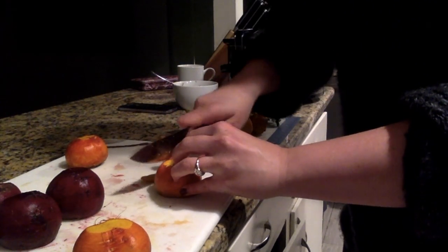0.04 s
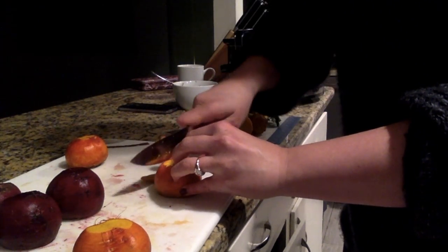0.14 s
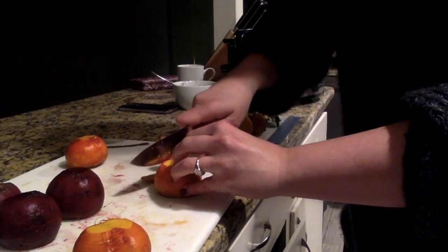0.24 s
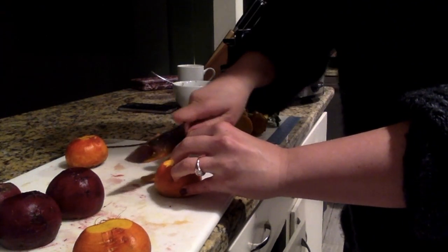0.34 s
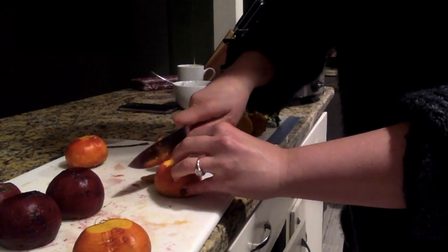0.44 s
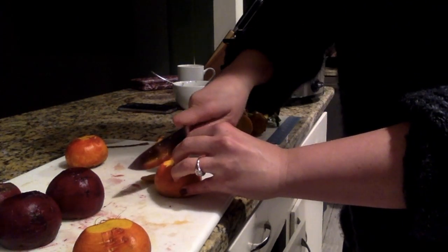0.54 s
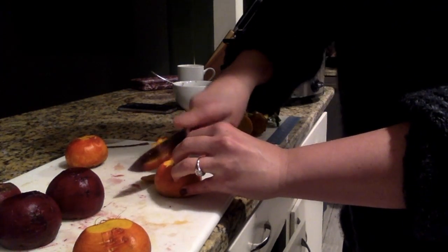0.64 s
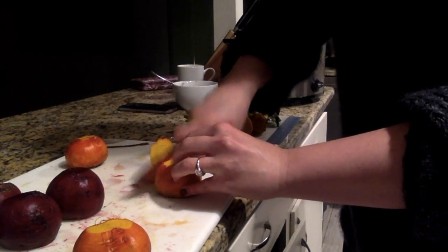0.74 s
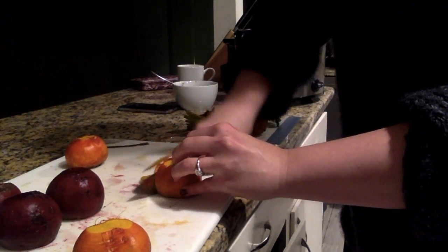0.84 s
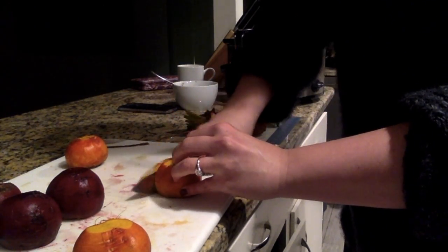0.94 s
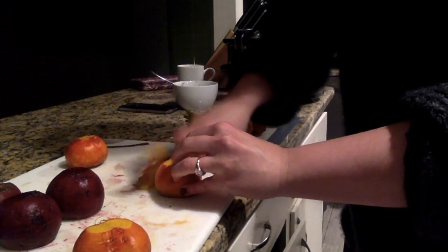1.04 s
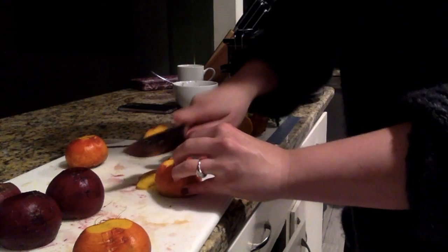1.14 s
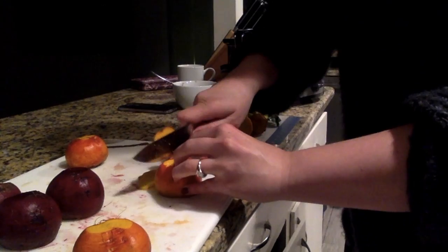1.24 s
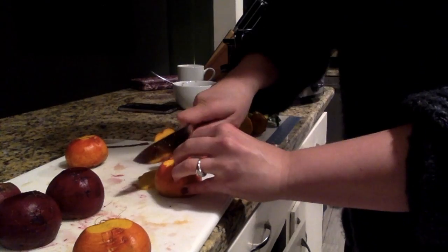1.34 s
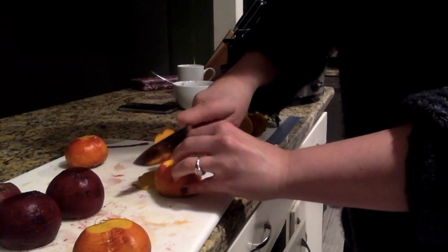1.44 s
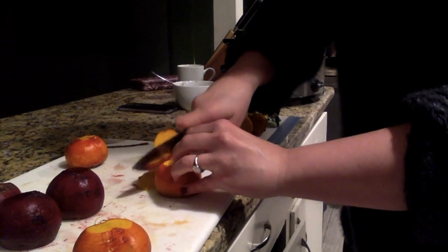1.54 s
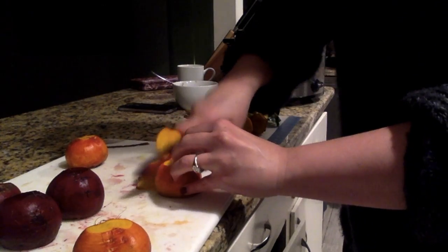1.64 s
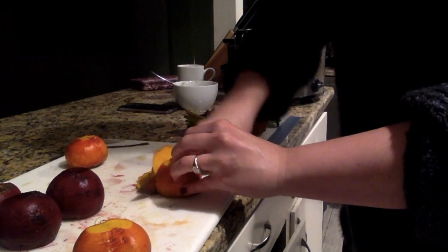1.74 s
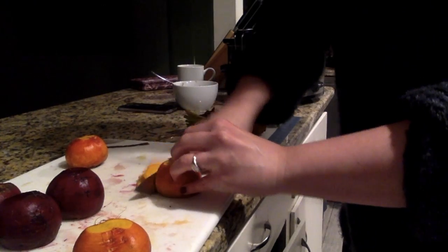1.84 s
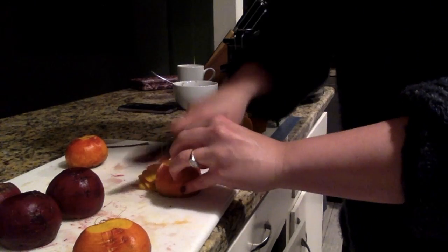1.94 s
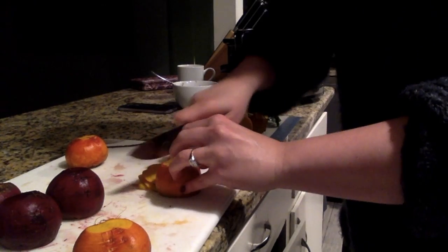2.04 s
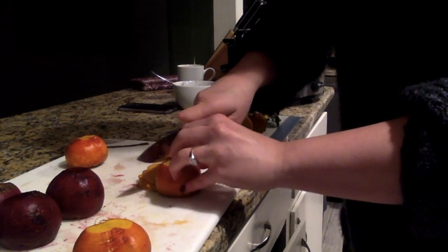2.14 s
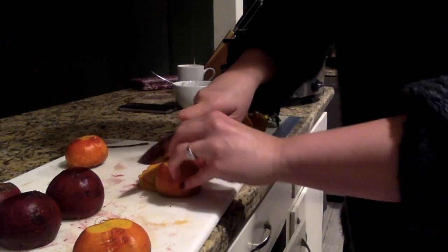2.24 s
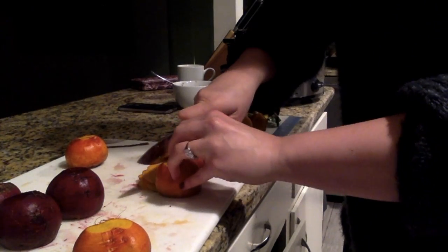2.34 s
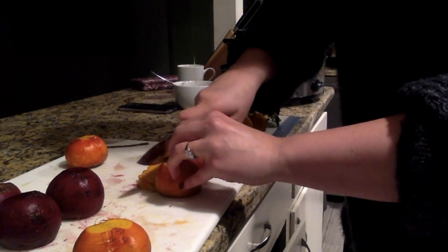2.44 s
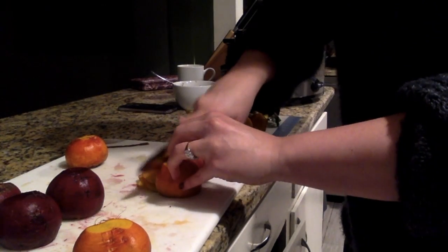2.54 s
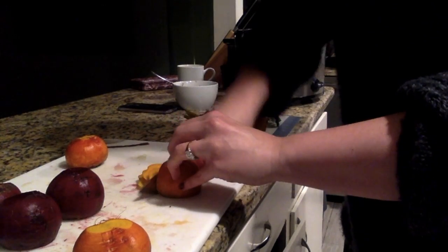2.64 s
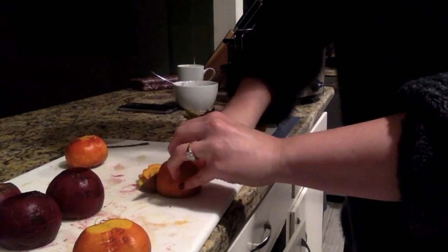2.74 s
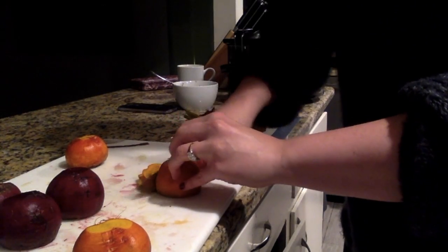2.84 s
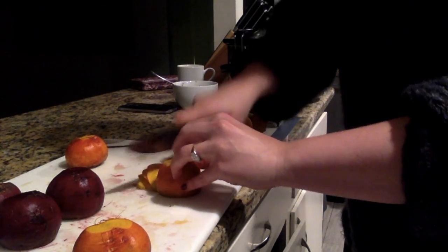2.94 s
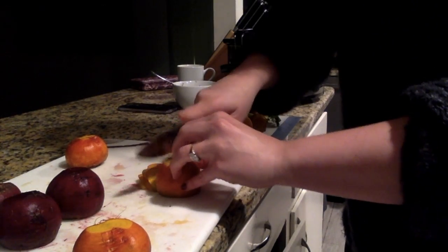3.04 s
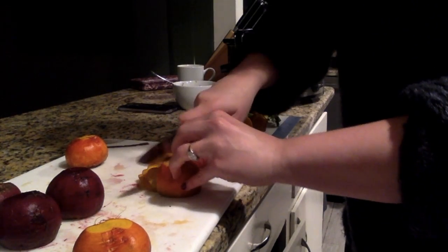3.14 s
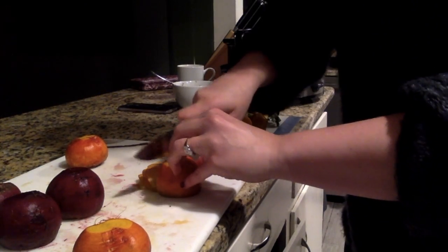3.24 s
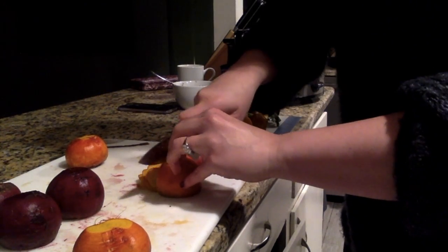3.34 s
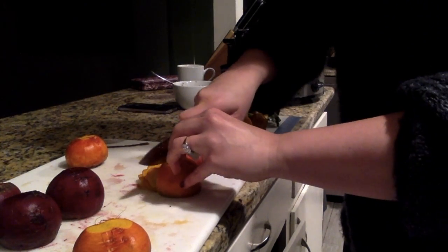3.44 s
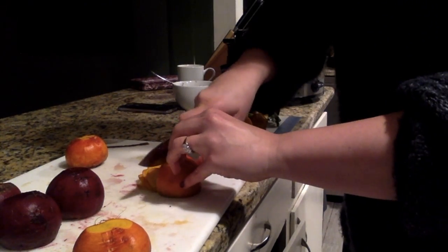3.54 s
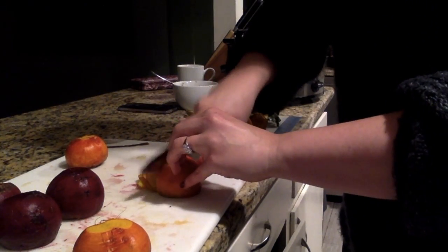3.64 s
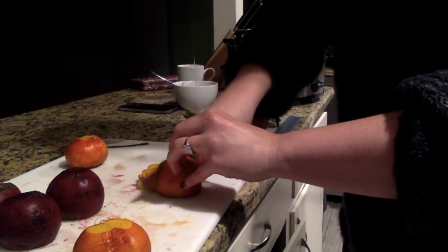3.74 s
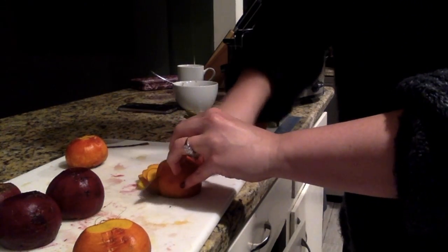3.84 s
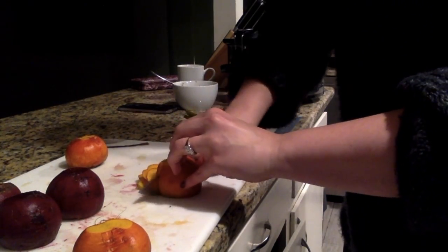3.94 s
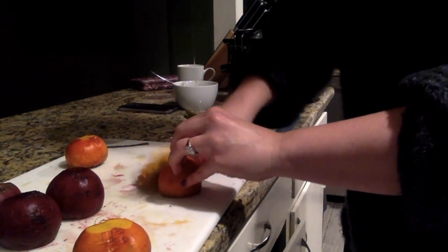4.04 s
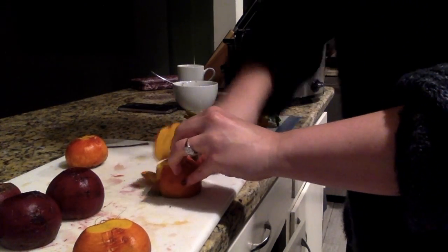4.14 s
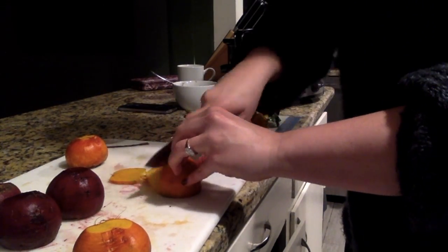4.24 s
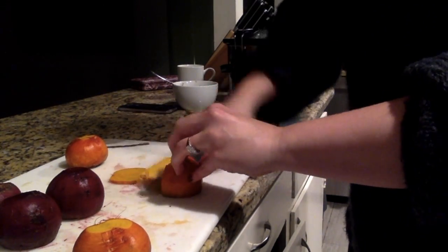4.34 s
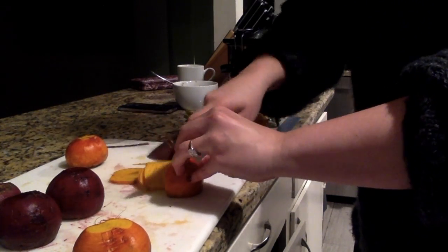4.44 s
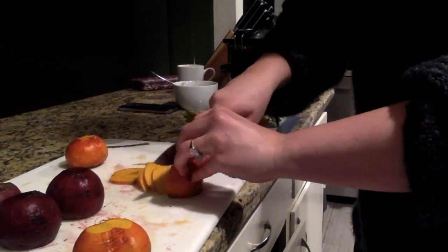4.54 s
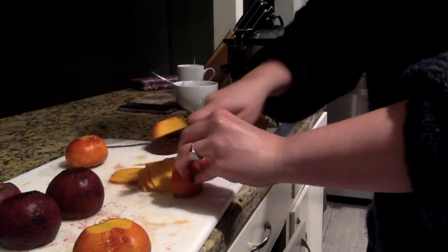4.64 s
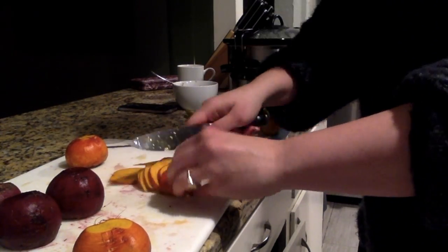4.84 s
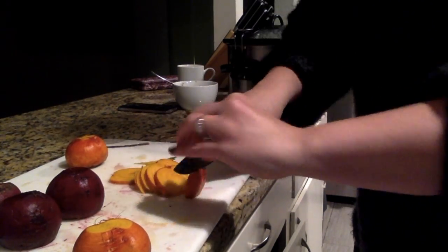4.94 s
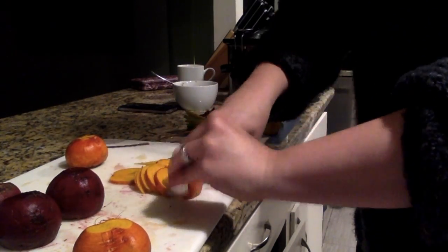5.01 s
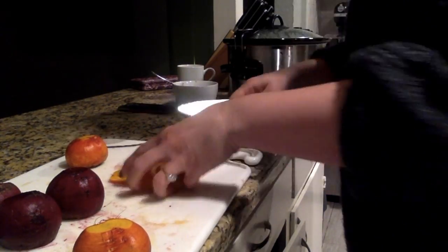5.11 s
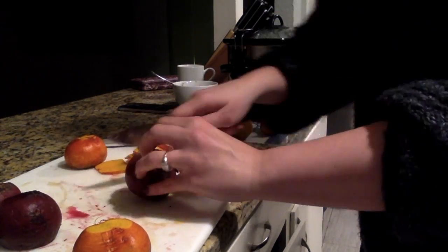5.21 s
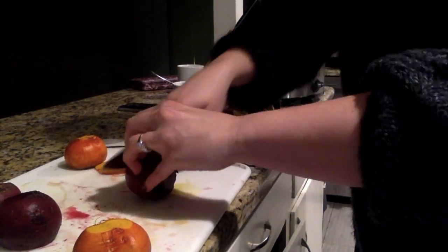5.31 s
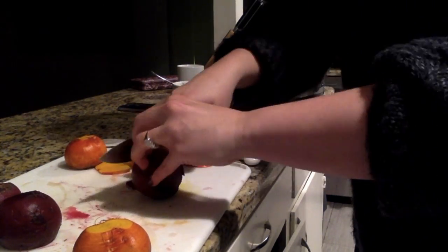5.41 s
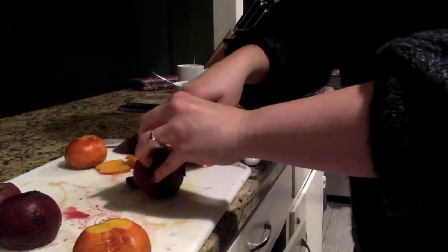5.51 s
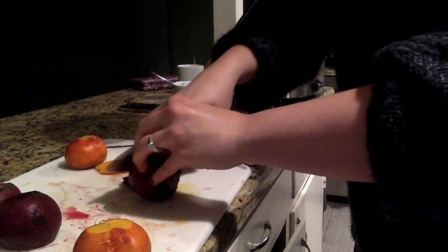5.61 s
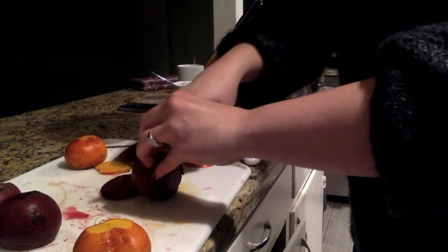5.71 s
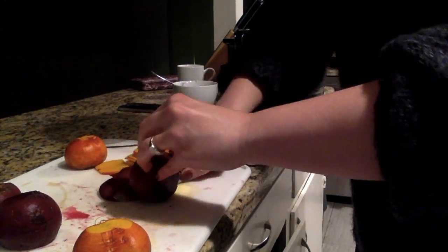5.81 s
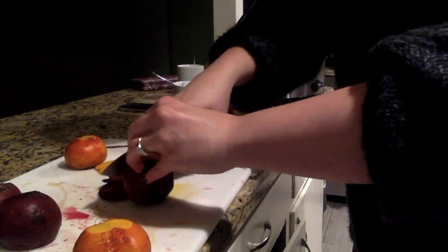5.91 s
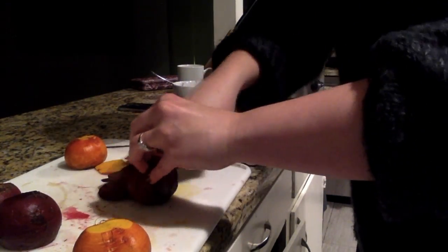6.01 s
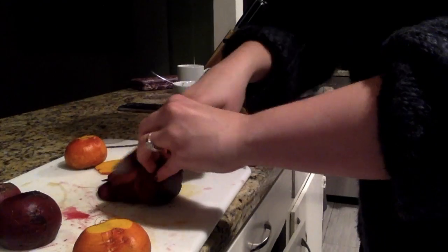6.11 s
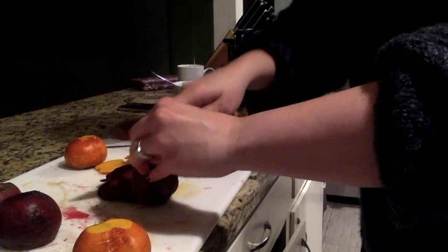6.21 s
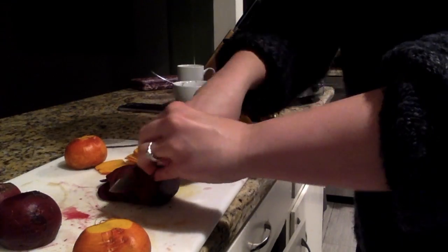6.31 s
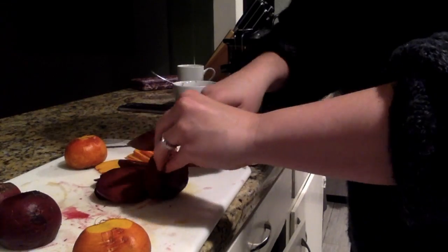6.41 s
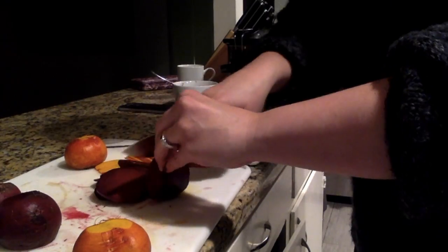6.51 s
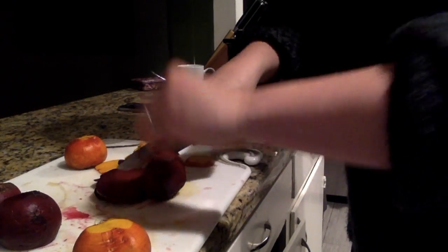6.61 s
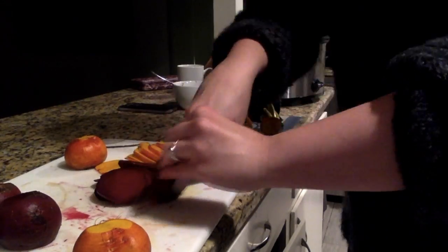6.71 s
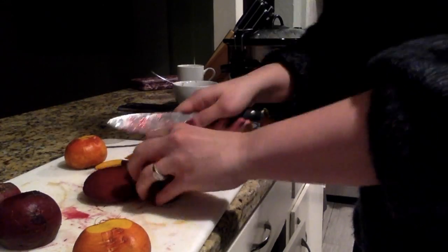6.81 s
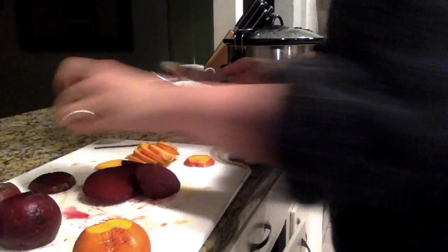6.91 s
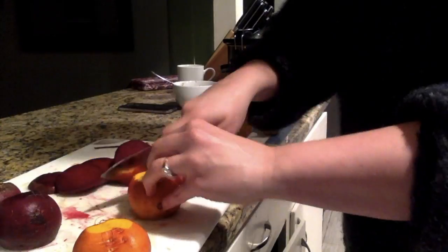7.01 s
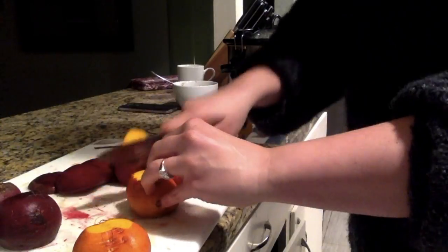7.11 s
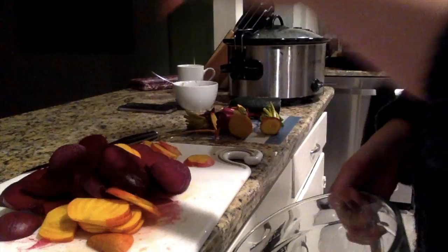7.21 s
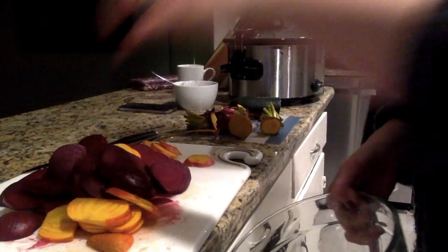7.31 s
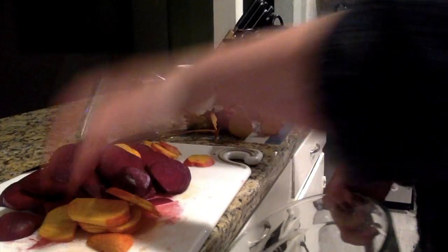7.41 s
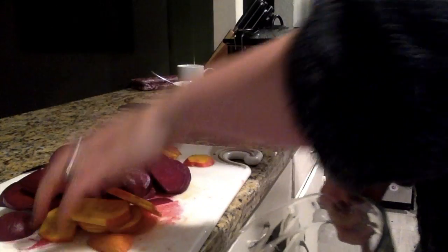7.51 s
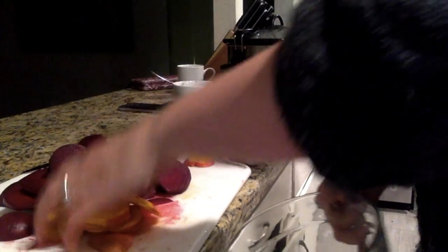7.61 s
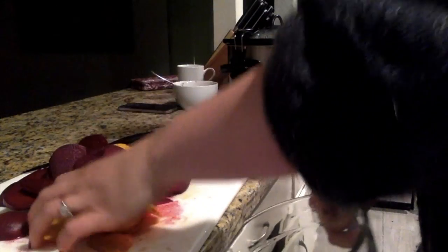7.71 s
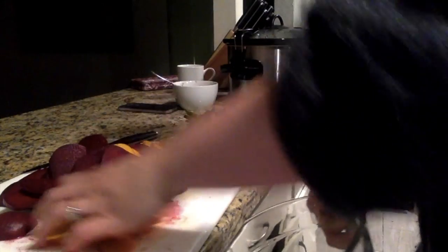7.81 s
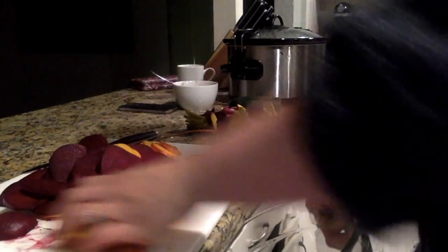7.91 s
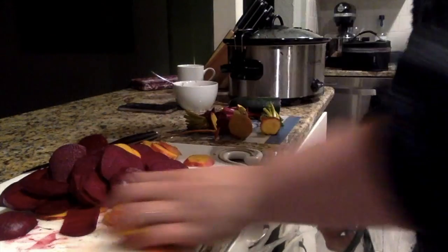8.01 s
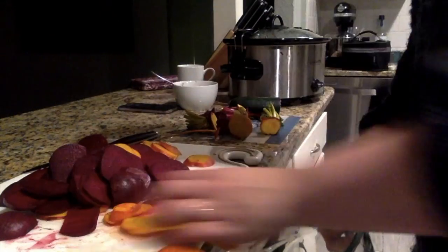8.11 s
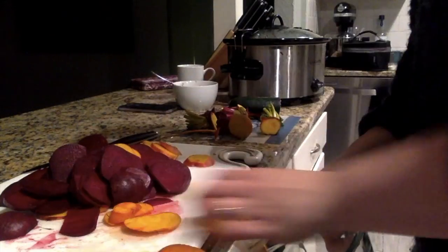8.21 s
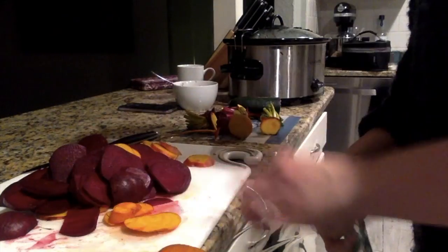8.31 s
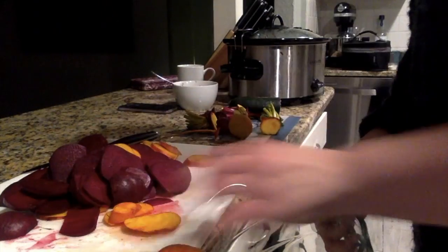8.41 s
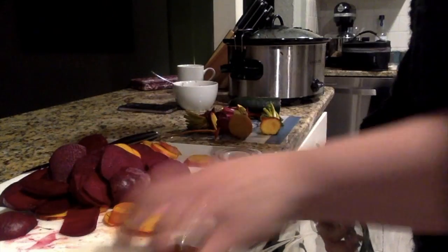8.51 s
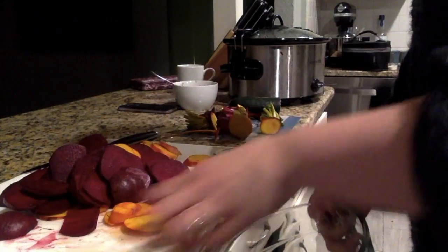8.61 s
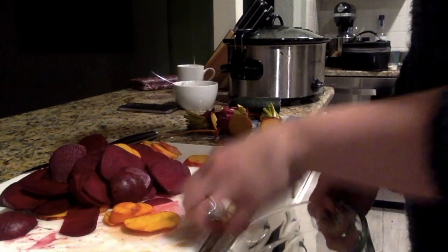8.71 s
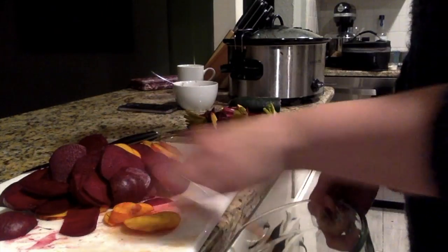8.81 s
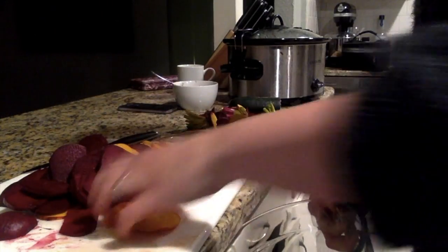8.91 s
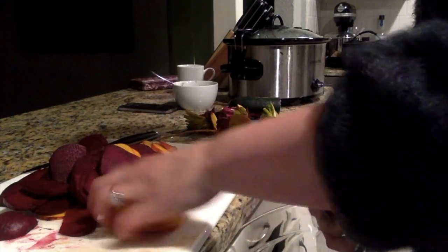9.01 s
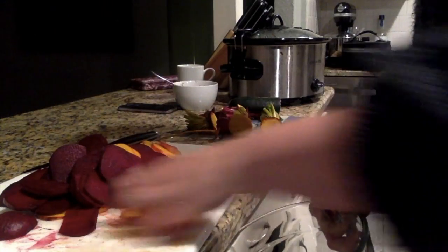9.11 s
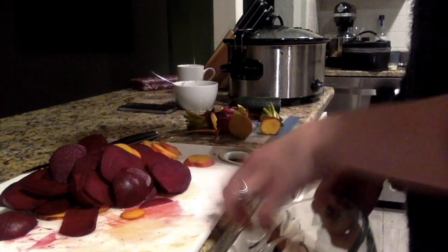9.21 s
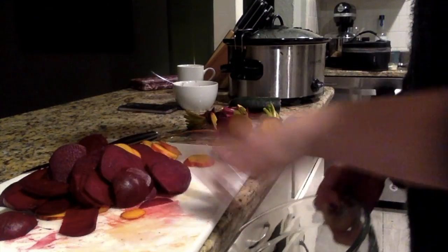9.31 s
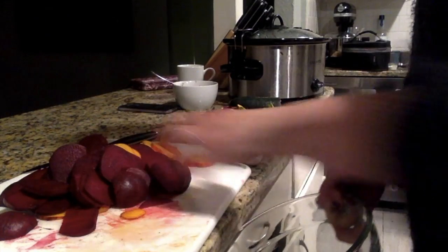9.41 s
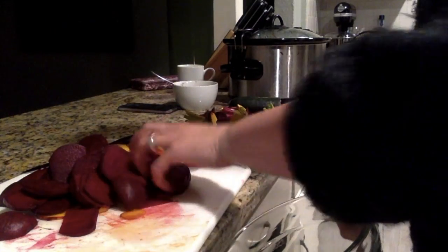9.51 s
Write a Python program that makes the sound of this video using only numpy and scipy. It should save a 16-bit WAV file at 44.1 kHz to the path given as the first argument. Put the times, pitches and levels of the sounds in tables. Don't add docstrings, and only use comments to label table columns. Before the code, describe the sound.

Near microphone, quiet kitchen with low hum. Four unhurried knife knocks on a board, each preceded by a short wet crunch, the third overloading slightly. Then about three seconds of dry, irregular, sped-up ticking with thin, high-pitched hum. It cuts to silence, normal speed returns, and beet slices are swept by hand, squeak faintly on plastic and land in a glass bowl in muffled, clinking thumps.

```python
import sys
import numpy as np
from scipy import signal
from scipy.fft import rfft, irfft, next_fast_len
from scipy.io import wavfile
from scipy.ndimage import uniform_filter1d, map_coordinates

SR = 44100
rng = np.random.default_rng(int(sys.argv[2]) if len(sys.argv) > 2 else 0)


def amplitude_ratio(level_db):
    exponent = np.asarray(level_db, float) / 20
    return 10 ** exponent


def to_wav(s):
    ch = np.atleast_2d(s).T
    pcm = np.round(np.clip(ch, -1, 1) * 32767)
    wavfile.write(sys.argv[1], SR, pcm.astype(np.int16))


N = 421155


def unit(x):
    return x / np.sqrt(np.mean(x ** 2) + 1e-20)


def along(points, hz):
    f, v = np.transpose(points)
    return np.interp(np.log(hz + 1), np.log(f + 1), v)


def noise(size, gain):
    m = next_fast_len(size)
    spectrum = rfft(rng.standard_normal(m)) * gain(np.fft.rfftfreq(m, 1 / SR))
    return unit(irfft(spectrum, m)[:size])


def add(track, s, sound):
    part = track[round(s * SR):][:len(sound)]
    part += sound[:len(part)]


def blow(db_of, decay, seconds, early_db, early_t60, direct, direct_s, attack):
    size = next_fast_len(int(seconds * SR))
    t, hz = np.arange(size) / SR, np.fft.rfftfreq(size, 1 / SR)
    centres = 30 * 1.35 ** np.arange(23)[:, None]
    shares = np.clip(1 - abs(np.log((hz + 1) / centres) / np.log(1.35)), 0, 1)
    bands = irfft(rfft(rng.standard_normal(size)) * amplitude_ratio(db_of(hz)) * shares, size)
    fading = bands * amplitude_ratio(-60 * t / along(decay, centres))
    tail = np.sum(fading, axis=0) / bands.sum(axis=0).std()
    early = amplitude_ratio(-early_db) + amplitude_ratio(-60 * t / early_t60) + direct * np.exp(-(t / direct_s) ** 4)
    return tail * early * (1 - np.exp(-t / attack))


def ring(modes, size, gains, rough_db, attack):
    t = np.arange(size) / SR
    hz, db, t60 = np.transpose(modes)[:, :, None]
    chance = rng.standard_normal((len(modes), 120))
    flutter = np.array([np.interp(220 * t, np.arange(len(row)), row) for row in chance])
    level = db + along(gains, hz) + rough_db * flutter - 60 * t / t60
    return np.sum(amplitude_ratio(level) * np.sin(2 * np.pi * hz * t), axis=0) * (1 - np.exp(-t / attack))


# f/Hz, density/dB per Hz
FIZZ_SPECTRUM = [(4000, -31), (5800, -6), (7000, -11.5), (10000, -2.5), (15300, -0.5), (15900, -1),
                 (16200, -40.5)]


def stroke(rows, spectrum, rate, depth_db, patchy_db):
    s, body_db, fizz_db, centre, spread = np.transpose(rows)
    size = int((s[-1] - s[0] + .012) * SR)
    t = s[0] + np.arange(size) / SR
    hz, frames, z = signal.stft(rng.standard_normal((2, size)), SR, nperseg=256)
    octaves = np.log2((hz[:, None] + 1) / np.interp(s[0] + frames, s, centre))
    away = octaves / (np.interp(s[0] + frames, s, spread) + 0.085)
    body = amplitude_ratio(along(spectrum, hz)[:, None] - 6 * away ** 2)
    fizz = amplitude_ratio(along(FIZZ_SPECTRUM, hz)[:, None] + 0 * away)
    colour = np.array([g / np.sqrt(np.mean(g ** 2, axis=0)) for g in (body, fizz)])
    patches = uniform_filter1d(rng.standard_normal(z.shape), size=4, axis=1)
    patches = uniform_filter1d(patches, size=10, axis=2)
    pair = signal.istft(z * colour * amplitude_ratio(patchy_db * unit(patches)), SR, nperseg=256)[1][:, :size]
    jumps = map_coordinates(rng.standard_normal(int(size * rate / SR) + 4), [np.arange(size) * rate / SR])
    return amplitude_ratio(depth_db * jumps + [np.interp(t, s, body_db), np.interp(t, s, fizz_db)]) * pair


def rubbing(spans, spectrum, rate, depth_db, patchy_db, wet_db):
    out, t = np.zeros(N + SR), np.arange(SR // 2) / SR
    for rows in spans:
        dry = stroke(rows, spectrum, rate, depth_db, patchy_db)
        tails = rng.standard_normal((2, len(t))) * amplitude_ratio(-60 * t / [[.4], [.14]])
        tails /= np.linalg.norm(tails, axis=1, keepdims=True)
        add(out, rows[0][0], dry.sum(axis=0))
        add(out, rows[0][0], amplitude_ratio(wet_db) * signal.fftconvolve(dry, tails, axes=1).sum(axis=0))
    return out[:N]


# t/s, peak level/dB, weight/dB
CHOPS = [
    (.784, -12, -7),
    (1.689, -15, -14.5),
    (2.622, 0.5, 17.5),
    (3.826, -13.5, -19),
]
# f/Hz, density/dB per Hz
BOARD_SPECTRUM = [(35, -80), (60, -51), (290, -35.5), (586, -32.5), (742, -16.5), (1080, -10.5), (1240, -6),
                  (1810, -13.5), (2190, -30), (2580, -20), (3950, -21.5), (4500, -30), (6920, -43.5),
                  (15400, -48.5), (16500, -79.5)]
# f/Hz, width/Hz, level/dB
BOARD_RESONANCES = [(1210, 210, 3), (2150, 48, -3.5), (2620, 130, 2.5), (2949, 160, -5.5), (3591, 100, 2),
                    (4565, 260, -1.5)]
# f/Hz, level/dB, t60/s
BOARD_MODES = [(790, -17, 0.22), (873, -8, 0.036), (964.5, -6.5, 0.22), (1115, -9, .3), (1210, -5.5, .35),
               (1290, -3, 0.3), (1569, -9, 0.016), (1779, -19, 0.028), (2530, -20, 0.35), (3240, -20, .25),
               (3550, -23.5, .35), (3697, -21, .3)]
# f/Hz, t60/s
KITCHEN_DECAY = [(80, 0.22), (250, 0.33), (600, 0.51), (1300, 0.52), (2700, 0.56), (4000, 0.54),
                 (4800, .44), (5800, 0.47)]
# f/Hz, t60/s
TREBLE_DECAY = [(7500, .19), (12000, .15)]
BOOM_DB, BRIGHT_PER_WEIGHT, BRIGHT_DB = -1.5, .48, -0.5
LINGER, LINGER_PER_DB = 1.183, 0.0216


def chops():
    out = np.zeros(N)

    def resonances(hz):
        return sum(db * np.exp(-((hz - c) / w) ** 2) for c, w, db in BOARD_RESONANCES)

    for s, db, weight_db in CHOPS:
        bright_db = BRIGHT_DB + BRIGHT_PER_WEIGHT * weight_db
        linger = LINGER + LINGER_PER_DB * db
        force = [(60, 1.7 * weight_db), (110, weight_db), (250, 0.44 * weight_db), (850, BOOM_DB),
                 (1300, 0.002), (1800, 0.37 * bright_db), (2550, .5 * bright_db), (3200, bright_db),
                 (4000, bright_db), (4600, 1.2 * bright_db), (6000, 1.2 * bright_db), (9000, 0)]
        colour = lambda hz: along(BOARD_SPECTRUM, hz) + resonances(hz) + along(force, hz)
        decay = [(hz, linger * t60) for hz, t60 in KITCHEN_DECAY] + TREBLE_DECAY
        contact = dict(direct=1.3, direct_s=.012, attack=.0012)
        answer = blow(colour, decay, seconds=.85, early_db=3.0, early_t60=0.25, **contact)
        board = ring(BOARD_MODES, len(answer), force, rough_db=2, attack=0.0024)
        add(out, s, amplitude_ratio(db - 7.5) * (answer + 0.54 * board))
    return out


# touch t/s, bite t/s, end t/s, body and fizz level/dB at the end
CUTS = [
    (.56, 0.616, .772, -46, -46.5),
    (1.44, 1.54, 1.677, -45.5, -40),
    (2.46, 2.492, 2.608, -43.5, -40.5),
    (3.52, 3.59, 3.64, -45.5, -50),
    (3.58, 3.62, 3.7, -45.5, -48.5),
    (3.66, 3.698, 3.76, -48, -50.5),
    (3.7, 3.74, 3.814, -43, -44.5),
]
# f/Hz, density/dB per Hz
FLESH_SPECTRUM = [(290, -56.5), (500, -27), (668, -12), (802, 3), (1030, -12.5), (1200, -6), (1800, -9),
                  (2300, -2), (2900, -8.5), (3500, -8.5), (6500, -14.5), (8450, -48), (14300, -120)]
TOUCH_DB, BITE_DB, EDGE_HZ = -32, -10, 2380
FIZZ_TOUCH_DB, FIZZ_BITE_DB, FIZZ_MIDWAY_DB = -58, -35.5, -10


def knife():
    spans = []
    for touch, bite, end, db, fizz_db in CUTS:
        times = [touch, bite, (bite + end) / 2, end]
        body = db + np.array([TOUCH_DB, BITE_DB, BITE_DB / 2, 0])
        fizz = fizz_db + np.array([FIZZ_TOUCH_DB, FIZZ_BITE_DB, FIZZ_MIDWAY_DB, 0])
        octaves = np.clip((body + 57) / 4, .05, 2.5)
        spans.append([(s, b, f, EDGE_HZ, w) for s, b, f, w in zip(times, body, fizz, octaves)])
    return rubbing(spans, FLESH_SPECTRUM, rate=250, depth_db=2.0, patchy_db=2, wet_db=-3.5)


# t/s, peak level/dB, upper modes level/dB
TAPS = [
    (.595, -58, -17),
    (3.511, -56.5, 0),
    (3.568, -61, 7),
    (4.039, -72, 5),
]
# f/Hz, level/dB, t60/s
BLADE_MODES = [(2300, 1.5, .12), (2550, -6, 0.12), (4000, -10, 0.065), (5670, -11, .08)]


def taps():
    out = np.zeros(N)
    for s, db, upper_db in TAPS:
        ping = ring(BLADE_MODES, SR // 6, [(2500, 0), (3800, upper_db)], rough_db=8, attack=.001)
        add(out, s, amplitude_ratio(db) * ping)
    return out


# t/s, peak level/dB, body level/dB
SNAPS = [(.772, -38, -4), (2.6223, -11.5, 6.5), (2.649, -32, -14), (4.042, -72, 1), (8.229, -50, -25),
         (8.2558, -35, -6), (8.264, -35, -3), (8.297, -42.5, 6), (8.332, -44, 8.5), (8.3555, -60, 18),
         (8.4158, -65, 28), (8.878, -44, -2), (8.886, -51, -5), (9.301, -38.5, 2.5)]


def snaps():
    out = np.zeros(N)
    for s, db, body_db in SNAPS:
        tone = [(800, body_db - 21.5), (2500, body_db), (5000, body_db - 0.5), (7500, -10.0),
                (11000, -1.5), (16000, 0.5), (16500, -30)]
        tick = blow(lambda hz: along(tone, hz), KITCHEN_DECAY + TREBLE_DECAY, seconds=0.22, early_db=12,
                    early_t60=.02, direct=1.7, direct_s=0.0012, attack=0.00075)
        add(out, s, amplitude_ratio(db) * tick)
    return out


# t/s, peak level/dB, low level/dB, middle level/dB
QUICK_KNOCKS = [(4.1735, -17, -4, -5.5), (4.2822, -5.5, 0, 6), (4.343, -30, 3, -3.5), (4.439, -8, -7, -1.5),
                (4.5098, -10.5, 7, -4.5), (4.6327, -7.5, 6, 2.5), (4.7794, -21.5, 6.5, -5),
                (4.7941, -27, -5, -2.5), (5.0452, -23.5, -1, -6.5), (5.3678, 1, -6.5, -3.5),
                (5.4889, -3, 0, -6), (5.5565, -5.5, 3, -2.5), (5.6472, -0.5, 0, -3.5),
                (5.7517, -1.5, -1.5, 5), (5.8307, -0.5, -3.5, 0.5), (5.9496, -2, 0, 0.5),
                (6.0462, -3.5, 0.5, -3.5), (6.1995, 0, 4.5, -2.5), (6.3667, -4, 2.5, -1.5),
                (6.743, -9.5, 8, -2), (6.7748, 2, -1.5, -4.5), (6.917, -27.5, -8, -7), (7.0499, -2, 2, 1),
                (7.1086, -0.5, 3.5, -3.5), (7.1627, -1.5, -4, -5.5)]
# f/Hz, density/dB per Hz
QUICK_SPECTRUM = [(18, -37), (30, -13.5), (1540, -16.5), (1810, -12), (3320, -15), (4210, -13.5),
                  (7940, -15), (12800, -3.5), (15400, -2.5), (16600, -14.5)]
# f/Hz, t60/s
QUICK_DECAY = [(200, .047), (2000, .044), (5000, .034), (14000, .029)]
# t/s, level/dB, length/ms, low level/dB
SCUFFS = [(4.168, -47.5, 6, 4), (4.193, -53.5, 2.1, 8.5), (4.215, -51.5, 5, 0.5), (4.355, -53, 2.3, 6.5),
          (4.369, -50, 2.8, -7), (4.433, -45, 3.3, 2.5), (4.589, -50.5, 3, 1), (4.763, -55, 2.8, -1),
          (4.819, -53, 1.8, 6), (5.032, -58, 2.6, 2.5), (5.14, -53.5, 3.6, -10), (5.158, -57.5, 4.4, 0),
          (5.199, -47.5, 9.6, 2), (5.218, -51, 1.7, 5), (5.347, -55, 1.8, 3.5), (5.46, -61.5, 2.2, -1.5),
          (5.634, -62, 1.5, -5.5), (5.815, -57.5, 4.6, 4), (5.936, -52, 1.8, 0.5), (6.024, -53.5, 4.1, 5),
          (6.147, -55.5, 2.8, 3), (6.18, -52, 2.2, 3), (6.337, -48.5, 2.2, 4), (6.686, -48, 1.8, 0),
          (6.85, -46, 9.4, 1), (6.873, -43, 2.7, 1), (6.974, -51.5, 2.6, -3), (6.992, -56, 4.1, 6),
          (7.103, -47, 3.4, 0), (7.157, -47.5, 3.1, 2)]
# f/Hz, density/dB per Hz
QUICK_AIR = [(35, -84), (60, -53), (1330, -26), (1940, -6), (2240, -29.5), (2520, -0.5), (2970, -13.5),
             (4980, -11), (15000, -31.5), (16500, -32.5)]
SPEED = 13.62
LEAD_DB, LEAD_FOLLOWS = -58, 0.71
SCUFF_RISE, SCUFF_FALL = 0.5, 0.56


def fast_forward():
    air = noise(N, lambda hz: amplitude_ratio(along(QUICK_AIR, hz)))
    out = amplitude_ratio(-78.5) * air + amplitude_ratio(-78) * hum(SPEED)
    t = np.arange(-SR // 25, SR // 12) / SR
    for s, db, low_db, middle_db in QUICK_KNOCKS:
        balance = [(60, low_db - 5.0), (500, low_db + 0.5), (3000, middle_db), (10000, 0.0),
                   (16000, -1), (16700, -26)]
        colour = lambda hz: along(QUICK_SPECTRUM, hz) + along(balance, hz)
        knock = blow(colour, QUICK_DECAY, seconds=.1, early_db=5, early_t60=.014,
                     direct=1.7, direct_s=.0012, attack=.00015)
        add(out, s + 0.00011, amplitude_ratio(db - 13) * knock)
        swell = amplitude_ratio(LEAD_DB + 1300 * t) * (t < 0)
        add(out, s + t[0], amplitude_ratio(LEAD_FOLLOWS * db) * swell * noise(len(t), lambda hz: amplitude_ratio(colour(hz))))
    for s, db, ms, low_db in SCUFFS:
        tone = [(300, low_db - 9.0), (3000, low_db - 3), (9000, -2.0), (13000, 2), (15900, 1.0), (16400, -21)]
        rise = np.exp(-(700 * t / (SCUFF_RISE * ms)) ** 2)
        fall = np.exp(-600 * np.abs(t) / (SCUFF_FALL * ms))
        scuff = np.where(t < 0, rise, fall) * noise(len(t), lambda hz: amplitude_ratio(along(tone, hz)))
        add(out, s + t[0], amplitude_ratio(db - 1.5) * scuff)
    return out


# t/s, peak level/dB, deep level/dB, bright level/dB, wall modes level/dB
DROPS = [
    (7.595, -15, -1, -6, -4),
    (7.696, -16.5, -1, -3.5, -1.5),
    (8.2555, -21, 3, 5, -6),
    (8.332, -28.5, 21, 1, -9),
    (8.414, -45, -1, 11, -13),
    (8.857, -32, -3, 9, 15.5),
    (8.88, -30, 18, 32, -1),
    (9.301, -39, -4.5, 29, -6),
]
# f/Hz, density/dB per Hz
THUD_SPECTRUM = [(29, -53), (50, -28.5), (220, -5.5), (280, -3.5), (566, -2), (639, -1.5), (1090, -9.5),
                 (1490, -3.5), (1610, -23.5), (5540, -36), (7230, -68), (15300, -39), (16500, -47)]
# f/Hz, level/dB, t60/s
GLASS_MODES = [(283.2, -3.5, 0.24), (505, -5, 0.15), (626, -6.5, 0.38), (843, -9, 0.36), (1446, -12, 0.47),
               (2606, -18.5, 0.26), (3720, -26, 0.14), (4110, -22.5, 0.18), (4696, -26.5, 0.16),
               (6140, -30, 0.11), (7677, -35, .12), (8180, -27, 0.12), (9120, -23, 0.15), (12510, -24, .07)]
RIM_DAMPS_DB_PER_S, RIM_DULLEST_DB = 26, -31.5


def bowl():
    out = np.zeros(N)
    for s, db, deep_db, bright_db, wall_db in DROPS:
        since_filling = max(s - DROPS[1][0], 0)
        rim_db = max(RIM_DULLEST_DB, -RIM_DAMPS_DB_PER_S * since_filling)
        weight = [(140, deep_db), (300, 0), (600, 0), (1100, 0.14 * bright_db), (2200, bright_db)]
        colour = lambda hz: along(THUD_SPECTRUM, hz) + along(weight, hz)
        decay = [(150, 0.31), (500, 0.324), (1500, 0.36), (4000, 0.14)] + TREBLE_DECAY
        thud = blow(colour, decay, seconds=0.49, early_db=3.6, early_t60=0.022,
                    direct=1.15, direct_s=0.0056, attack=0.00222)
        struck = [(900, -5.0), (1400, wall_db + 0.31 * rim_db), (2600, wall_db), (3750, wall_db + 0.2 * rim_db),
                  (4100, wall_db + 0.6 * rim_db), (6000, wall_db + rim_db)]
        glass = ring(GLASS_MODES, len(thud), struck, rough_db=5.5, attack=.001)
        add(out, s, amplitude_ratio(db - 13.5) * (thud + glass))
    return out


# t/s, peak level/dB, f/Hz, t60/s
PATS = [(8.2564, -18.5, 420, 0.014), (8.2556, -25.5, 1480, 0.022), (8.2631, -21, 430, 0.018),
        (7.596, -22.5, 478, 0.038), (8.161, -59, 3000, .04), (8.194, -52, 3260, .06),
        (8.196, -53, 2300, .07), (8.195, -57, 4000, .05), (8.27, -40.5, 626, 0.32), (8.3, -33, 158, 0.085),
        (8.866, -35.5, 163, .12), (8.881, -38, 230, 0.053), (9.285, -27, 494, 0.026),
        (9.2854, -37.5, 1420, 0.038), (9.295, -30.5, 1500, 0.034)]
# t/s, peak level/dB, f/Hz, t60/s
WALL_TAP = [
    (8.858, -45, 2606, .33),
    (8.859, -46, 1450, .4),
]


def pats():
    out = np.zeros(N)
    for s, db, hz, t60 in PATS + WALL_TAP:
        add(out, s, ring([(hz, db, t60)], SR // 5, [(100, 0)], rough_db=1.0, attack=0.46 / hz))
    return out


PRESS_DB_PER_S, LIFT_DB_PER_S, FADE_DB = 285, 301.5, 30
FIZZ_SAG_DB = 8.5


def sweep(s, hold, db, hz, fizz_db, octaves):
    times = [s - FADE_DB / PRESS_DB_PER_S, s, s + hold, s + hold + FADE_DB / LIFT_DB_PER_S]
    body = db - np.array([FADE_DB, 0, 0, FADE_DB])
    fizz = body + fizz_db - np.array([0, 0, FIZZ_SAG_DB, FIZZ_SAG_DB])
    return [(a, b, c, hz, octaves) for a, b, c in zip(times, body, fizz)]


# full pressure t/s, hold/s, scrape level/dB, centre f/Hz, fizz over scrape/dB
SWEEPS = [(7.758, .13, -67, 1570, -14), (8.0, 0.04, -68, 3860, -1), (8.17, .03, -73, 2591, -21),
          (8.296, 0.031, -47, 2400, -23), (8.354, 0.042, -55, 2200, -35), (8.651, .03, -54, 2580, -25.5),
          (8.952, 0.011, -65.5, 2270, -27), (9.033, .02, -61.5, 2780, -25), (9.092, .085, -44, 2490, -23.5),
          (9.2, 0.033, -58.5, 2300, -27), (9.318, 0.0027, -52, 2040, -16), (9.541, .01, -75, 2150, -9)]
# full pressure t/s, hold/s, scrape level/dB, centre f/Hz, fizz over scrape/dB
TOUCHES = [
    (7.284, .02, -62.5, 3060, -30),
    (8.525, .1, -58, 2700, -30),
]
# f/Hz, density/dB per Hz
SCRAPE_SPECTRUM = [(350, -39), (600, -5), (715, 9), (887, -8), (1340, -1), (2580, -5), (5470, -15.5),
                   (7000, -22.5), (9100, -75), (15400, -120)]
PALM_OCTAVES, FINGER_OCTAVES = 0.7, .14
WIDENS_PER_DB = .008


def hands():
    spans = [sweep(*row, FINGER_OCTAVES) for row in TOUCHES]
    spans += [sweep(*row, PALM_OCTAVES + WIDENS_PER_DB * (row[2] + 55)) for row in SWEEPS]
    return rubbing(spans, SCRAPE_SPECTRUM, rate=500, depth_db=2.2, patchy_db=3.0, wet_db=-12.0)


# t/s, length/s, f/Hz, glide/Hz, level/dB
SQUEAKS = [
    (7.788, .1, 4300, 298, -75),
    (7.82, 0.063, 11600, 599.5, -80),
    (7.89, .1, 6000, -400, -71),
    (7.919, 0.16, 3785, 300, -66),
    (7.93, .06, 10200, -500, -77),
    (8.0, .04, 7900, 99.5, -72),
    (8.005, .05, 10200, 0, -66),
]


def squeaks():
    out = np.zeros(N)
    for s, length, hz, glide_hz, db in SQUEAKS:
        u = np.linspace(0, 1, int(length * SR))
        chance = rng.standard_normal((2, 300))
        wander, rough = (map_coordinates(row, [u * length * 1600]) for row in chance)
        pitch = hz + glide_hz * u + 260 * wander
        whistle = np.sin(np.pi * u) * np.sin(2 * np.pi * np.cumsum(pitch) / SR)
        add(out, s, amplitude_ratio(db + 4 * rough) * whistle)
    return out


# f/Hz, width/Hz, level/dB
HUM_RESONANCES = [(119.5, 4.5, 1.5), (129, 11, 2.5), (155, 5, -1), (184, 3.7, 8.5), (254, 12, 1),
                  (362, 3.9, 7), (810, 8, -4)]
# f/Hz, level/dB
MOTOR_TONES = [(59.5, -15), (119.8, -15), (147.4, -12), (184.2, -4), (355.8, -7)]


def hum(speed):
    def resonators(f):
        return sum(amplitude_ratio(db) * speed * w * f / abs((speed * c) ** 2 - f * f + 1j * f * speed * w)
                   for c, w, db in HUM_RESONANCES)

    t = np.arange(N) * speed / SR
    motor = sum(amplitude_ratio(db) * np.sin(2 * np.pi * hz * t) for hz, db in MOTOR_TONES)
    return noise(N, lambda f: resonators(f) ** 2) + motor


# f/Hz, density/dB per Hz
AIR_SPECTRUM = [(30, -40.5), (55, -22.5), (85, -24), (124, -8.5), (187, -8), (214, -15), (321, -14),
                (358, -10), (483, -22), (1060, -20), (1500, -22.5), (1900, -32), (5000, -36.5), (8000, -42),
                (16000, -40)]
# t/s, level/dB
AIR_LEVEL = [(0, -68), (0.302, -73), (4.1, -68), (7.3, -68), (9.55, -67)]


def background():
    s, db = np.transpose(AIR_LEVEL)
    air = noise(N, lambda hz: amplitude_ratio(along(AIR_SPECTRUM, hz))) + amplitude_ratio(-3.5) * hum(1)
    return amplitude_ratio(np.interp(np.arange(N) / SR, s, db)) * air


def kitchen():
    cutting = chops() + knife() + taps() + snaps()
    gathering = bowl() + pats() + hands() + squeaks()
    return cutting + gathering + background()


# f/Hz, depth/dB under the loudest middle band at which a band drops out
GATE_DEPTH = [(1900, 60), (2800, 42), (4300, 40), (6000, 44), (8000, 54), (16000, 58)]


def band_gated(x):
    hz, frames, z = signal.stft(x, SR, nperseg=1024)
    band = (11 * np.log(hz / 600 + 1)).astype(int)
    member = band == np.arange(band.max() + 1)[:, None]
    count = member.sum(axis=1)
    level = 10 * np.log10(member @ abs(z) ** 2 / count[:, None] + 1e-20)
    centre = member @ hz / count
    under = level[centre > 700].max(axis=0) - level
    under = under + 2.5 * rng.standard_normal(level.shape)
    lost = np.clip((under - along(GATE_DEPTH, centre)[:, None]) / 2, 0, 1)
    return signal.istft(z * amplitude_ratio(-16 * lost[band]), SR, nperseg=1024)[1][:N]


FAST_FROM, FAST_TO, BACK = 4.11, 7.213, 7.282


def scene():
    t = np.arange(N) / SR
    slow = np.clip((FAST_FROM + 0.0092 - t) / 0.016, 0, 1) + (t > BACK)
    fast = (t > FAST_FROM) * (t < FAST_TO)
    return (slow * band_gated(kitchen()) + fast * fast_forward())[None]


def roll_off(x):
    return signal.sosfilt(signal.butter(12, 16790, fs=SR, output="sos"), x)


def record(dry):
    clipped = dry / (1 + np.abs(dry / 1.05) ** 8) ** (1 / 8)
    return roll_off(clipped)


dry = scene()
out = record(dry)
to_wav(out)
```